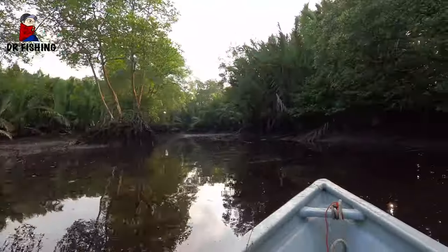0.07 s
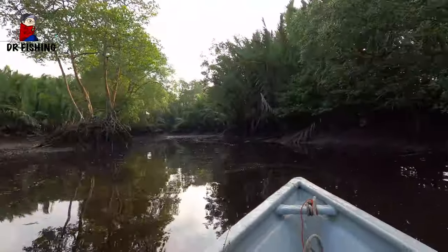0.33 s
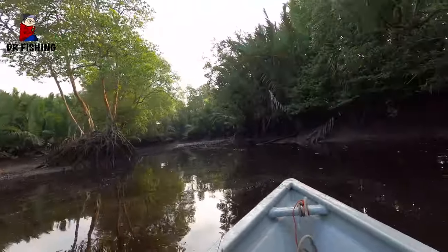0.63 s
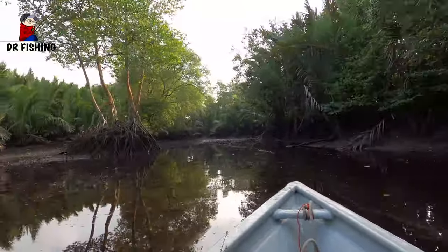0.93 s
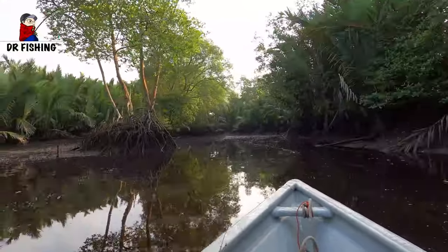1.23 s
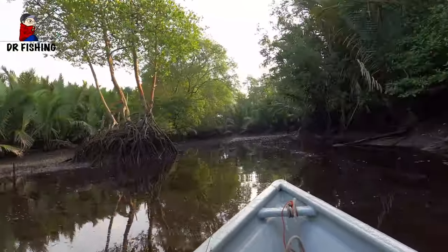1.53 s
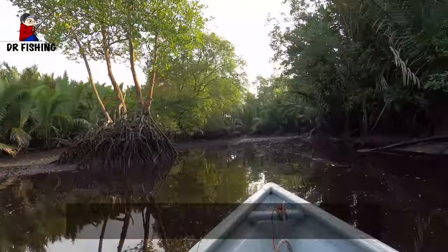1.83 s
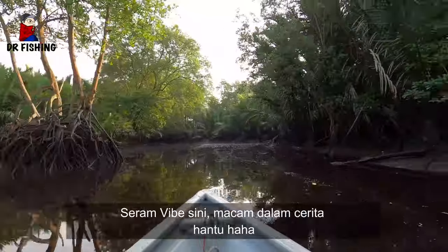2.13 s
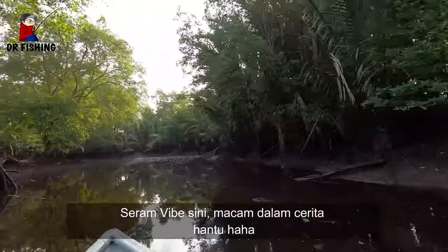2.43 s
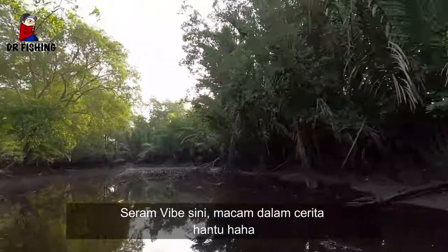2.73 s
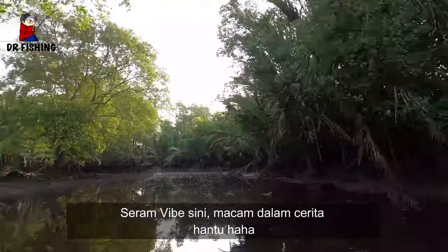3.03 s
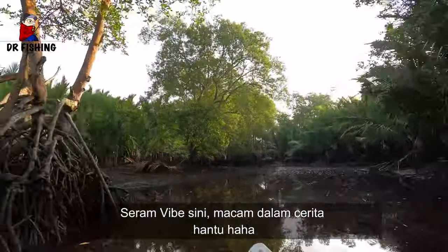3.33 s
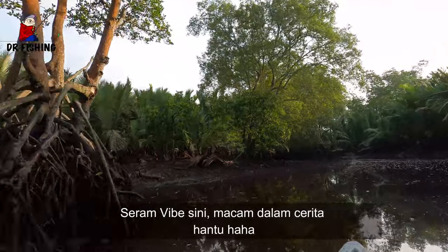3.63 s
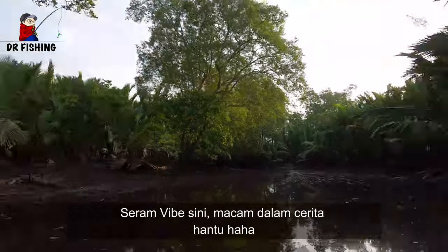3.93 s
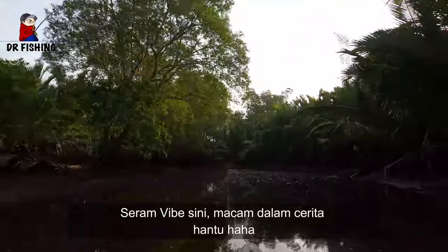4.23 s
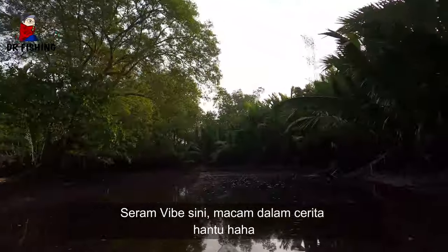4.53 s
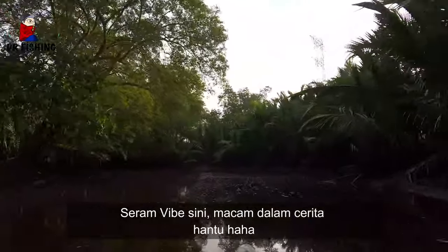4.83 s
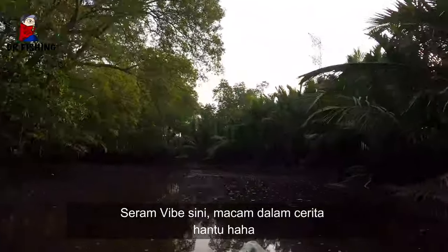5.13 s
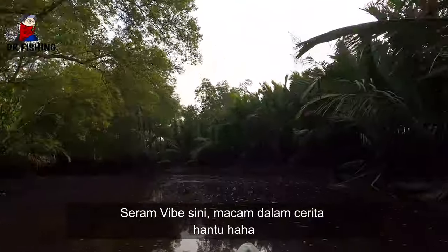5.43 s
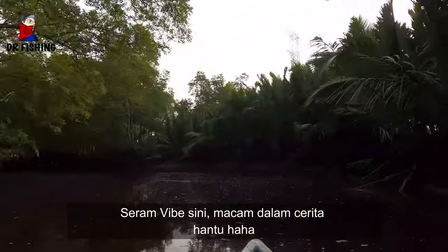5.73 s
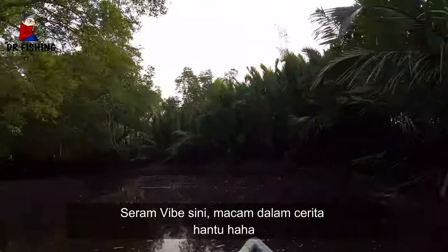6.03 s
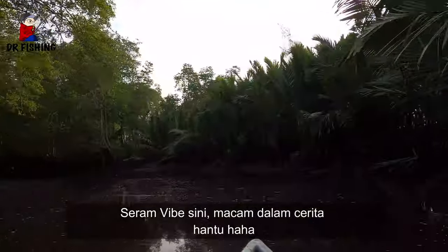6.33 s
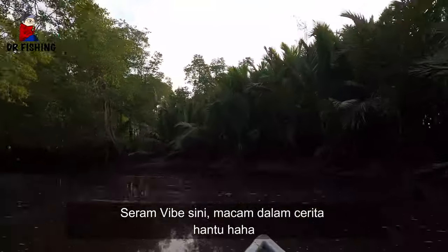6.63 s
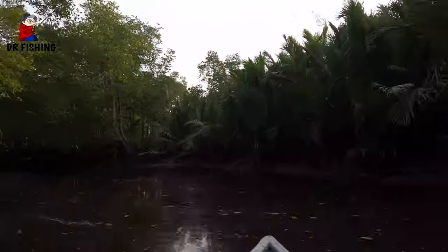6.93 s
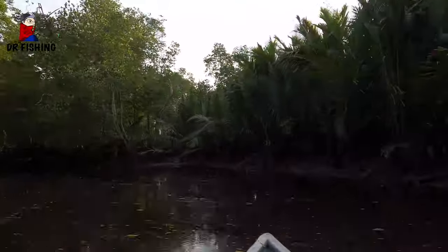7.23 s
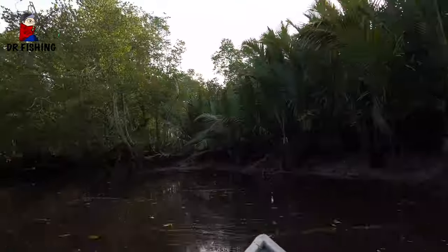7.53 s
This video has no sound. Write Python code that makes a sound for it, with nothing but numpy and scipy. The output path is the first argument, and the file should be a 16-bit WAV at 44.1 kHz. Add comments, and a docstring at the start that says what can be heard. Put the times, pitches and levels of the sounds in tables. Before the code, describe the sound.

A bird gives quick rising runs of echoing hoots in a mangrove forest, with faint high chips and a soft insect buzz behind.

```python
"""Birds and insects on a mangrove creek

A bird gives quick rising runs of hoots, and the forest reverberates after each run. A small bird answers
with bursts of falling chips, and thin whistles come from far off; all these calls are swept sine tones.
A cicada's tymbals excite its body resonances in a buzz that gives way to a lower note once a second.
Crickets throb over a wash of distant forest noise, and the boat's hull bumps softly twice."""
import sys
import numpy as np
from scipy import signal
from scipy.fft import rfft, irfft
from scipy.io import wavfile
from scipy.ndimage import uniform_filter1d

SR = 44100
rng = np.random.default_rng(int(sys.argv[2]) if len(sys.argv) > 2 else 0)


def master_out(mix):
    """Clip the mix to full scale and print it as 16-bit PCM to the path in sys.argv[1]."""
    frames = np.transpose(np.atleast_2d(mix))
    ceiling = np.clip(frames, -1, 1)
    pcm = np.round(ceiling * 32767).astype(np.int16)
    wavfile.write(sys.argv[1], SR, pcm)


N = 343098
TIME = np.arange(N) / SR

# spectrum of still air and distant forest: f/Hz, relative spectral density/dB
AIR_SPECTRUM = [(22, -26), (50, -5), (80, -1.5), (200, 0), (400, -4), (650, -1.5), (1200, -4), (2100, -6.5),
                (2800, -1), (3900, 0), (5400, 3), (6900, -4.5), (8900, -4), (9600, -13), (15500, -18)]
# cricket choruses: f/Hz, bandwidth/Hz, level/dB, throb rate/Hz, wing-stroke rate/Hz, stroke depth
CRICKET_CHORUSES = [(5756, 190, -50, 6.3, 33, .3), (6002, 110, -51.5, 5.5, 24, 0.3),
                    (8105, 670, -55, 4.2, 37, 0.4)]
# resonances of the cicada's body: f/Hz, bandwidth/Hz, relative level/dB
CICADA_MODES = [(1599, 190, -4), (3307, 310, -0.5), (4695, 330, 1.5), (6250, 290, -2)]
# envelope of the cicada's buzz: t/s, gain/dB
BUZZ_ENVELOPE = [(0, -53.3), (2.3, -53.2), (4.4, -50.6), (7.78, -50.8)]
# runs of hoots: t/s, count, shortest period/s, first pitch/Hz, warm-up/hoots, level at full pitch/dB
HOOT_RUNS = [(0.0285, 8, .1293, 753, 1.74, -1.2), (3.1875, 7, .1313, 778, 1.15, -1.3),
             (7.5125, 2, .128, 759, 1.7, -1.8)]
# height of the upward pitch flick in a hoot: t/s, rise/Hz
FLICK_HEIGHTS = [(0.29, 6), (0.555, 24), (0.69, 72), (0.96, 20), (3.32, 9), (3.45, 63), (3.59, 80),
                 (4.0, 69), (7.5, 3)]
# the forest's reverberation of a hoot: level/dB, T60/s, build-up/s
FOREST_DECAYS = [(-12.6, 0.62, 0.033), (-15.5, 2.9, 0.13), (-27.3, 10, 0.29)]
# calls of far birds: t/s, duration/s, f/Hz, level/dB, rms waver as a fraction of f
FAR_WHISTLES = [(0.072, 0.12, 4580, -41.5, 0.035), (1.35, 0.031, 5500, -35, 0.0051),
                (1.97, 0.24, 5505, -40.5, 0.0055), (2.11, 0.054, 5520, -35.5, .003)]
# bursts of chips: t/s, count, level/dB
CHIP_BURSTS = [(0.4695, 5, -28.5), (0.7604, 4, -28), (1.0106, 3, -28), (1.2626, 3, -29), (1.4737, 3, -28),
               (6.1216, 4, -27.4), (6.4066, 3, -27.2), (6.6546, 3, -27), (6.9078, 3, -27.5)]
# bumps on the hull: t/s, duration/s, level/dB
HULL_BUMPS = [(0.546, 0.28, -54.5), (2.804, .14, -57)]


def gain_of(db):
    """Amplitude ratio of a level in decibels."""
    return 10 ** (np.asarray(db) / 20)


def unit_rms(x):
    """Normalisation to an rms of 1."""
    return x / np.sqrt(np.mean(x ** 2) + 1e-20)


def add(mix, start, sound):
    """Superposition: a sound joins the mix at start seconds."""
    part = mix[max(round(start * SR), 0):][:len(sound)]
    part += sound[:len(part)]


def phase_of(hz):
    """Phase in radians is the time integral of angular frequency."""
    return 2 * np.pi * np.cumsum(hz) / SR


def drift(max_hz):
    """Random fluctuation: low-pass noise of rms 1."""
    return unit_rms(irfft(rfft(rng.standard_normal(N)) * (np.fft.rfftfreq(N, 1 / SR) < max_hz), N))


def resonate(x, hz, width):
    """Resonance: a steep band-pass response, scaled to rms 1."""
    detune = 2 * (np.fft.rfftfreq(N, 1 / SR) - hz) / width
    return unit_rms(irfft(rfft(x) / (1 + 1j * np.sqrt(2) * detune - detune ** 2), N))


def scatter(x, decays, lo_hz, hi_hz):
    """Multiple scattering off trunks and leaves within a band; decays: level/dB, T60/s, build-up/s."""
    t = np.arange(4 * SR) / SR
    power = 0
    for db, t60, build in decays:
        envelope = gain_of(-60 * t / t60) * (1 - np.exp(-(t / build) ** 2))
        power += (gain_of(db) * unit_rms(envelope)) ** 2
    hz = np.fft.rfftfreq(len(t), 1 / SR)
    band = (hz > lo_hz) & (hz < hi_hz)
    echoes = signal.hilbert(irfft(rfft(rng.standard_normal(len(t))) * band))
    # dense foliage returns an even flow
    echoes = echoes.real / np.sqrt(uniform_filter1d(abs(echoes) ** 2, size=2048))
    return signal.fftconvolve(x, echoes * np.sqrt(4 * power * (hi_hz - lo_hz) / SR / len(t)))[:N]


def air(level_db=-43):
    """Stationary broadband noise: the soft wash of the far forest."""
    hz, db = np.transpose(AIR_SPECTRUM)
    colour = gain_of(np.interp(np.log(np.fft.rfftfreq(N, 1 / SR) + 1), np.log(hz), db))
    return gain_of(level_db) * unit_rms(irfft(rfft(rng.standard_normal(N)) * colour, N))


def crickets(throb_db=2.5):
    """Stridulation: narrow noise bands, amplitude-modulated by wing strokes and an uneven throb."""
    chorus = np.zeros(N)
    for hz, width, db, throb_hz, stroke_hz, depth in CRICKET_CHORUSES:
        throb = np.sin(2 * np.pi * throb_hz * TIME + 1.5 * drift(max_hz=2))
        stroke = 1 + depth * np.sin(2 * np.pi * stroke_hz * TIME + 2 * drift(max_hz=4))
        chorus += gain_of(db + throb_db * throb) * stroke * resonate(rng.standard_normal(N), hz, width)
    return chorus


def cicada_notes(first_s=.524, period_s=1.044, final_db=-42.9, onset_db=-12, swell_s=.75):
    """Periodic lower notes approach their final strength exponentially: t/s, gain/dB."""
    elapsed = np.arange(0, N / SR - first_s, period_s)
    return zip(first_s + elapsed, final_db + onset_db * np.exp(-elapsed / swell_s))


def cicada(click_hz=123, note_hz=1464, pause_s=.39, lead_s=.1, note_s=.13, rasp_s=.27, duck_db=-10):
    """Forced resonance: tymbal clicks ring the body; the buzz dips for each note and its longer rasp."""
    tymbal = 1 + .33 * np.cos(phase_of(click_hz * (1 + .005 * drift(max_hz=3))))
    clicks = tymbal * rng.standard_normal(N)
    note_shape = signal.windows.tukey(int(note_s * SR), .2) * np.linspace(1.3, .5, int(note_s * SR))
    paused, tone_envelope, rasp_envelope = np.zeros((3, N))
    for start, db in cicada_notes():
        add(paused, start - lead_s, signal.windows.tukey(int(pause_s * SR), .5))
        add(tone_envelope, start, gain_of(db) * note_shape)
        add(rasp_envelope, start, gain_of(db) * signal.windows.tukey(int(rasp_s * SR), .3))
    buzz = sum(gain_of(db) * resonate(clicks, hz, width) for hz, width, db in CICADA_MODES)
    buzz *= gain_of(np.interp(TIME, *np.transpose(BUZZ_ENVELOPE)) + duck_db * paused)
    phase = phase_of(note_hz * (1 + .008 * drift(max_hz=80)))
    tone = tymbal * (np.sin(2 * phase) + gain_of(-7) * np.sin(phase))  # the second harmonic dominates
    rasp = resonate(clicks, hz=2920, width=240) + .45 * resonate(clicks, hz=3220, width=90)
    notes = tone_envelope * tone + .54 * rasp_envelope * rasp
    echoes = scatter(notes, [(-3, .82, .026)], lo_hz=1200, hi_hz=3700)
    return buzz + gain_of(-2.5) * notes + echoes


def hoots(full_hz=830.7, flat_hz=78.3, flat_db=-24.3, easing_s=.0009):
    """Relaxation to full pitch: as a run warms up, its hoots grow louder, longer and fuller."""
    for start, count, period, first_hz, warm_up, db in HOOT_RUNS:
        for k in range(round(count)):
            pitch = full_hz + (first_hz - full_hz) * np.exp(-(k / warm_up) ** 1.16)
            flatness = abs(full_hz - pitch) / flat_hz
            length = .0798 - .029 * flatness ** 2
            flick_hz = np.interp(start, *np.transpose(FLICK_HEIGHTS))
            fade_db = 2 - 17 * flatness  # a full hoot fades, a flat one swells
            roundness = .85 + .96 * flatness  # 1 is a sine arch, 2 a bell shape
            yield start, length, pitch, flick_hz, db + flat_db * flatness ** 2, fade_db, roundness
            start += period + easing_s * (k - 2.2) ** 2  # the pace peaks near the third gap


def hooting_bird(arch=.054, flick_at=.63, flick_width=.1483, dip_db_per_hz=.16, echo_db_per_hz=.062):
    """Frequency modulation: pure tones on a pitch arch; the direct hoot dips in level as it flicks up."""
    voice, outward, breath = np.zeros((3, N))
    margin = round(SR / 50)
    throat_lag = np.hanning(2 * int(.0053 * SR) + 1)  # the swollen throat takes time to fill and empty
    for start, length, pitch, flick_hz, db, fade_db, roundness in hoots():
        t = np.arange(-margin, int(length * SR) + margin) / SR
        progress = np.clip(t / length, 0, 1)
        lift_hz = flick_hz * np.exp(-((progress - flick_at) / flick_width) ** 2)
        bend_hz = lift_hz - pitch * arch * (2 * progress - 1) ** 2
        tone = np.sin(phase_of(pitch + bend_hz))
        envelope = abs(np.sin(np.pi * progress)) ** roundness
        envelope *= gain_of(db - fade_db * (progress - .5) - dip_db_per_hz * lift_hz)
        envelope = signal.fftconvolve(envelope, throat_lag / throat_lag.sum(), "same")
        add(voice, start + t[0], envelope * tone)
        # the echo keeps more of the flick
        add(outward, start + t[0], envelope * tone * gain_of(echo_db_per_hz * bend_hz))
        add(breath, start + t[0], envelope)
    rasp = gain_of(-49) * breath * resonate(rng.standard_normal(N), hz=556, width=93)
    return voice + rasp + scatter(outward, FOREST_DECAYS, lo_hz=730, hi_hz=910)


def far_birds():
    """Random frequency modulation: a faint twitter and thin, level whistles in a wash of echo."""
    voice, wobble = np.zeros(N), drift(max_hz=90)
    for start, length, pitch, db, waver in FAR_WHISTLES:
        progress = np.linspace(0, 1, int(length * SR))
        hz = pitch * (1 + waver * wobble[int(start * SR):][:len(progress)])
        envelope = abs(np.sin(np.pi * progress)) ** .5
        add(voice, start, gain_of(db) * envelope * np.sin(phase_of(hz)))
    return voice + scatter(voice, [(-7, .37, .023)], lo_hz=4000, hi_hz=6000)


def chips(period_s=.0339, first_db=-3.5, first_flat=.014):
    """Pulse trains, each opening with a softer, flatter chip: t/s, level/dB, frequency ratio."""
    for start, count, db in CHIP_BURSTS:
        for k in range(round(count)):
            yield start + k * period_s, db + first_db * (k == 0), 1 - first_flat * (k == 0)


def chipping_bird(top_hz=5210, bottom_hz=4200, length_s=.026, lead_s=.0064, jitter=.0071):
    """Frequency sweep: each chip falls ever more steeply, and the leaves return a short echo."""
    voice, progress = np.zeros(N), np.linspace(0, 1, int(length_s * SR))
    envelope = np.sin(np.pi * progress ** .96) ** 2
    sweep_hz = top_hz + (bottom_hz - top_hz) * progress ** 1.345
    for start, db, tuning in chips():
        hz = sweep_hz * (tuning + jitter * rng.standard_normal())
        add(voice, start - lead_s, gain_of(db) * envelope * np.sin(phase_of(hz)))
    return voice + scatter(voice, [(-5.5, .17, .0091)], lo_hz=4020, hi_hz=5580)


def hull():
    """Low resonance of the boat's hull: a narrow noise band swells and fades with each bump."""
    push = np.zeros(N)
    for start, length, db in HULL_BUMPS:
        add(push, start, gain_of(db) * np.hanning(int(length * SR)))
    return push * resonate(rng.standard_normal(N), hz=82, width=22)


def scene():
    """Linear superposition of birds, insects, boat and air in one channel."""
    birds = hooting_bird() + chipping_bird() + far_birds()
    return (birds + cicada() + crickets() + hull() + air())[None]


def record(dry):
    """Band limiting: a linear-phase low-pass filter removes the highest treble."""
    low_pass = signal.firwin(511, cutoff=15550, window=("kaiser", 9), fs=SR)
    return signal.oaconvolve(dry, low_pass[None], "same")


dry = scene()
out = record(dry)
master_out(out)
```